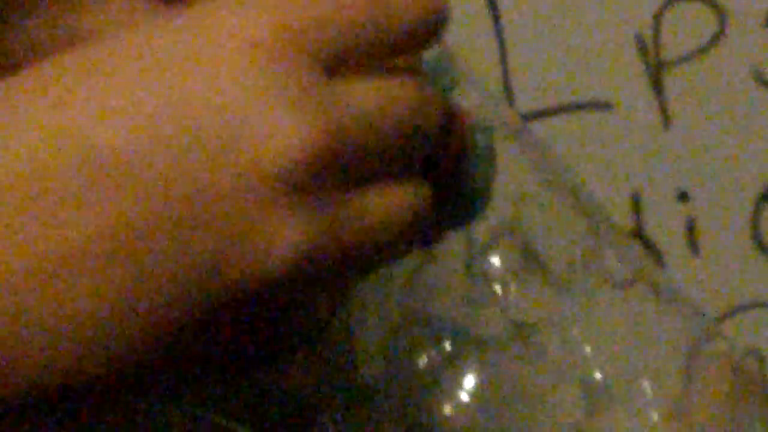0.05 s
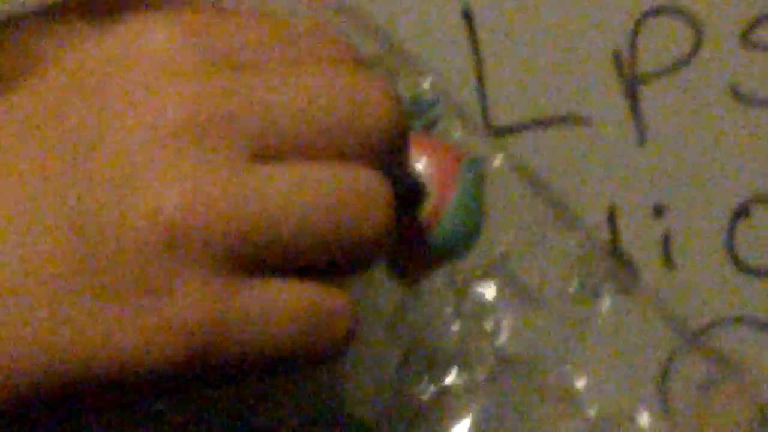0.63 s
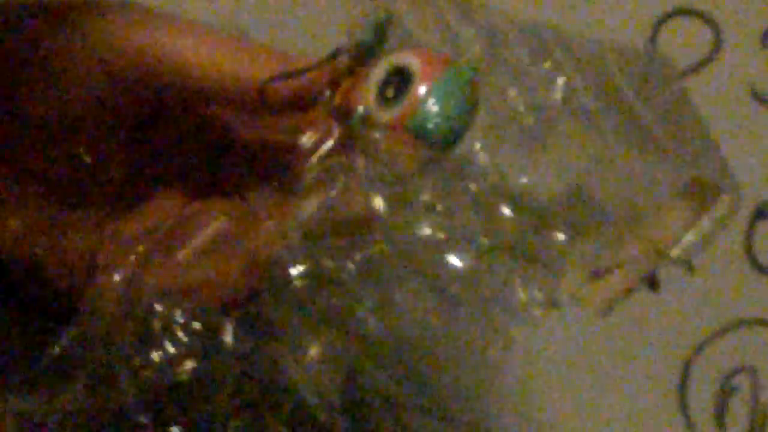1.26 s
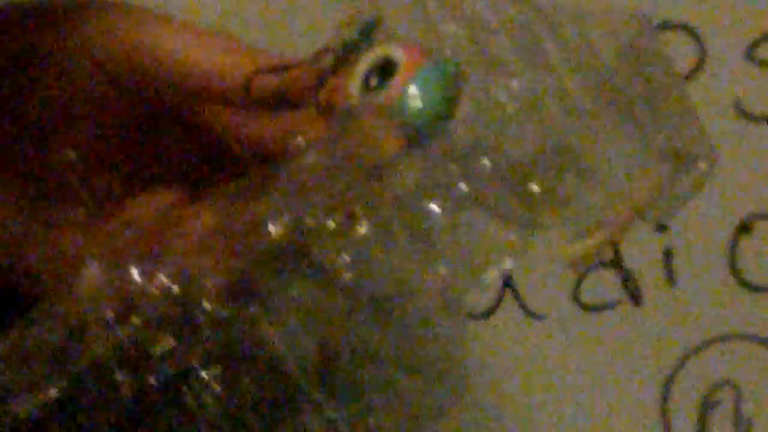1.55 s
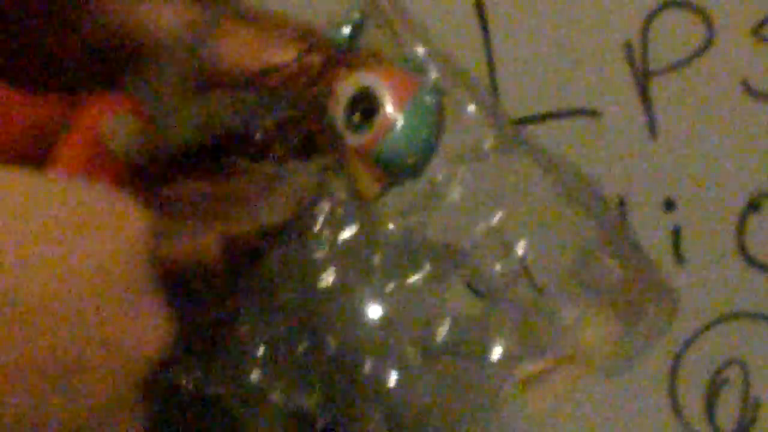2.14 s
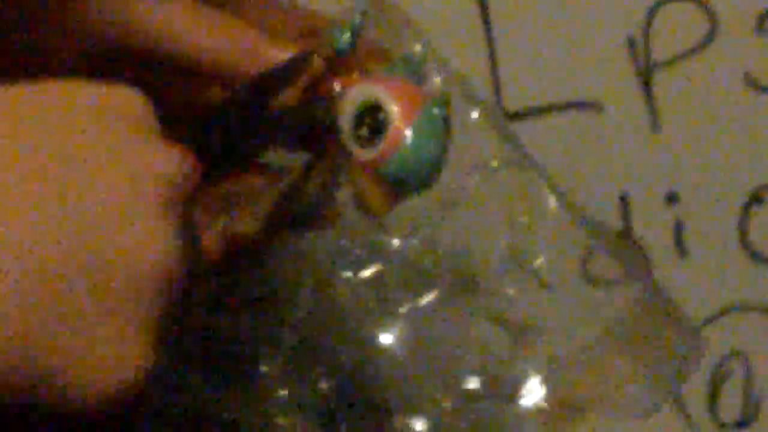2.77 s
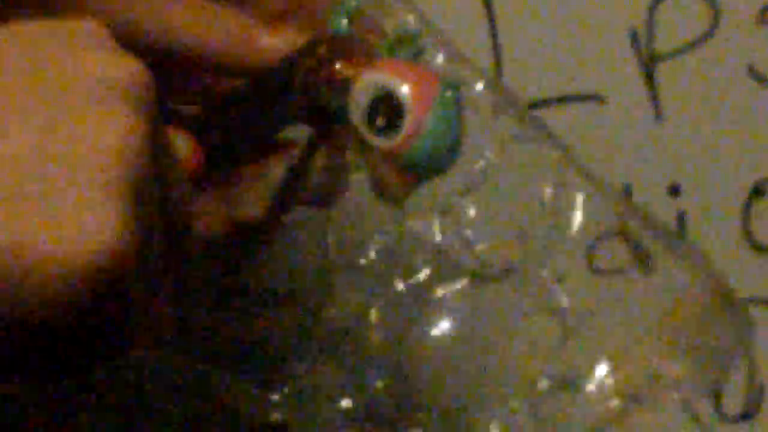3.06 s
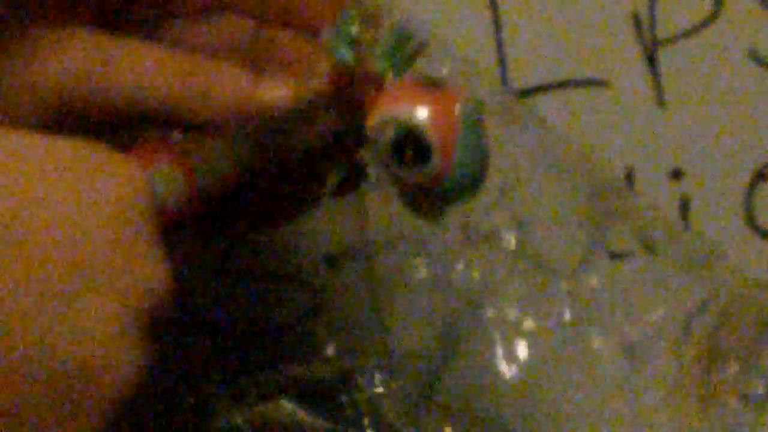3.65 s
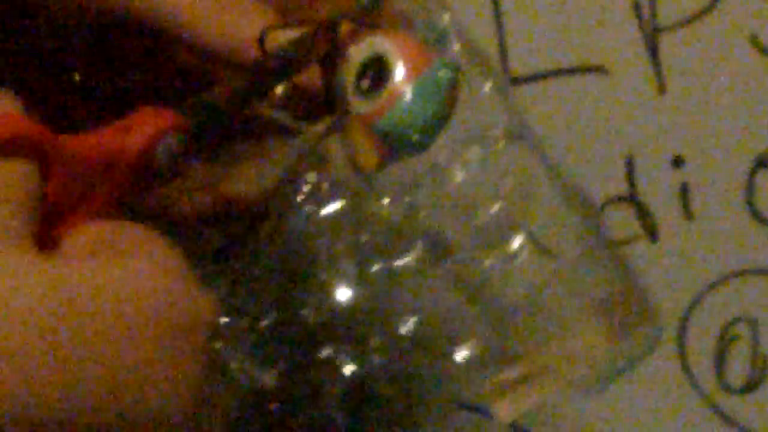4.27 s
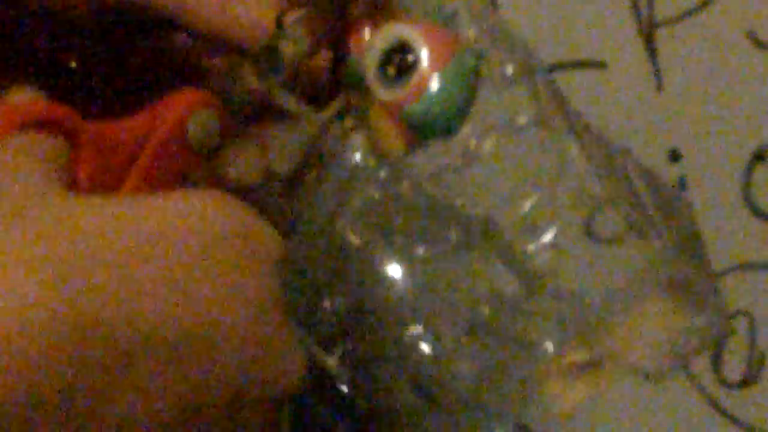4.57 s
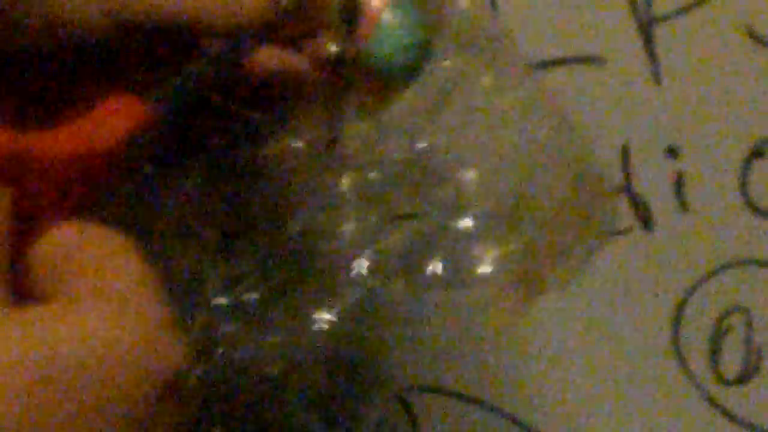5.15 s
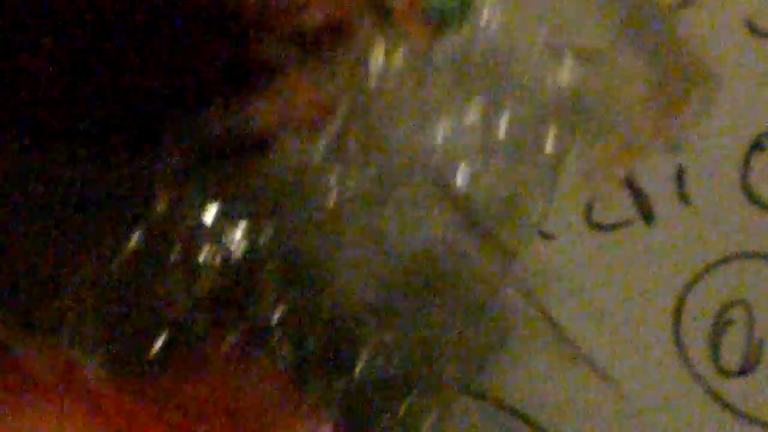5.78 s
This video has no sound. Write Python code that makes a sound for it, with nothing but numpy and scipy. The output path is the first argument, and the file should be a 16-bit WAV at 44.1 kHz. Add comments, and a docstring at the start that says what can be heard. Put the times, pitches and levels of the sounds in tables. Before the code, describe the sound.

A stiff plastic package crackles and buckles close by in a quiet room, pauses, then snaps more loudly as a seam gives.

```python
"""A room, a small camera's microphone close to hands prying at a stiff clear plastic package.
Over steady room hiss a low rumble swells and fades, each pry crinkles faintly, and fingertips bump the shell.
Creases snap, edges scrape, and at 1.2 s a whole panel buckles. After a lull the prying resumes at 3.4 s;
at 5 s one seam gives in a quickening run, then a panel buckles again and the last creases snap.
Near walls throw each snap back within about 15 ms, and a short room tail follows."""
import sys
import numpy as np
from scipy import signal
from scipy.fft import rfft
from scipy.io import wavfile

SR = 44100
rng = np.random.default_rng(int(sys.argv[2]) if len(sys.argv) > 2 else 0)


def persist_wave(psi):
    """Save psi, clipped to +-1, as 16-bit WAV."""
    counts = np.round(np.clip(psi, -1, 1) * 32767).astype(np.int16)
    wavfile.write(sys.argv[1], SR, np.atleast_2d(counts).T)


N = 265041


def amp(db):
    """Decibels to gain."""
    return 10 ** (np.asarray(db) / 20)


def unit(x):
    """Scales to rms 1."""
    return x / np.sqrt(np.mean(x ** 2) + 1e-20)


def read(points, hz):
    """Reads a table on a log-frequency axis."""
    f, value = np.transpose(points)
    return np.interp(np.log(hz + 1), np.log(f + 1), value)


def add(mix, s, sound):
    """Mixes a sound in at time s."""
    part = mix[max(round(s * SR), 0):][:len(sound)]
    part += sound[:len(part)]


def noise(length, hz, kind):
    """White noise through a low-, high- or band-pass filter."""
    return signal.sosfilt(signal.butter(2, hz, kind, fs=SR, output="sos"), rng.standard_normal(length))


def colour(x, db_of, size=4096):
    """Causal filter whose gain in dB is a function of frequency."""
    log_gain = np.log(amp(db_of(abs(np.fft.fftfreq(size, 1 / SR)))) + 1e-6)
    taps = np.fft.ifft(np.exp(signal.hilbert(log_gain).conj())).real
    return signal.fftconvolve(x, taps[:size // 2])[:len(x)]


def band_levels(edges, total_db, pitch_hz, focus):
    """Shares total_db among bands, each weaker by focus dB per octave from the pitch."""
    centres = np.sqrt(np.multiply(edges[:-1], edges[1:]))
    db = -focus * abs(np.log2(centres / pitch_hz))
    return total_db + db - 10 * np.log10(np.sum(amp(db) ** 2))


def set_bands(x, edges, levels_db, span_s):
    """Filters each band towards its level, counting its energy over span_s."""
    edges, hz = np.array(edges, float), np.fft.rfftfreq(len(x), 1 / SR)
    power = 2 * abs(rfft(x)) ** 2 / (len(x) * span_s * SR)
    have_db = 10 * np.log10(np.histogram(hz, edges, weights=power)[0] + 1e-20)
    low, high = edges[:-1], edges[1:]
    inner_hz = np.column_stack([low ** .8 * high ** .2, low ** .2 * high ** .8]).ravel()
    gains = np.column_stack([inner_hz, np.repeat(levels_db - have_db, 2)])
    return colour(x, lambda f: read(gains, f), size=2048)


# the room's steady air at the microphone: (frequency [Hz], level [dB])
AIR_SPECTRUM = [(15, -24), (30, -11), (60, -2), (115, 0.5), (170, 1), (260, -13.5), (450, -1), (700, -14.5),
                (880, -11), (990, 1), (1120, -12), (1400, -9), (3000, -13), (15500, -24)]

def room_tone(level_db=-73.7):
    """The air of the room hisses under everything."""
    return amp(level_db) * unit(colour(rng.standard_normal(N), lambda f: read(AIR_SPECTRUM, f)))


# pries of the hands: (start [s], letting go [s], peak over rest [dB])
PRIES = [(0.096, 0.178, 7.5), (0.364, 1.324, 24.5), (3.407, 3.547, 26.5), (3.543, 4.068, 17),
         (4.192, 4.473, 21.5), (4.679, 5.384, 31), (5.45, 5.69, 18.5)]

def effort(relax_db_per_s=60.5):
    """Each pry builds, then lets go. Gives dB over rest, and whether the plastic is strained."""
    t = np.arange(N) / SR
    effort_db, straining = np.zeros(N), np.zeros(N, bool)
    for start, end, db in PRIES:
        building = db * (t - start) / (end - start)
        relaxing = db - relax_db_per_s * (t - end)
        effort_db = np.maximum(effort_db, np.minimum(building, relaxing))
        straining |= (t > start) & (t < end)
    return effort_db, straining


# low rumble at the microphone: (frequency [Hz], level [dB])
RUMBLE_SPECTRUM = [(15, -35.5), (30, -15.5), (52, -13), (75, -6), (115, -3.5), (200, -13), (500, -15),
                   (1000, -16), (3000, -24), (16000, -39.5)]

def rumble(rest_db=-80.5):
    """A low rumble swells around the loud snaps and dies away after them."""
    swell_db, _ = effort()
    low_noise = unit(colour(rng.standard_normal(N), lambda f: read(RUMBLE_SPECTRUM, f)))
    return amp(rest_db + swell_db) * low_noise


# shell resonances, from whole panels to small creases: (frequency [Hz], width [Hz], lift [dB])
SHELL_MODES = [(231.5, 45, 8), (346.7, 13, 7), (555, 49, 9.5), (830, 110, 5.5), (1154, 28, 5),
               (1317, 43, 4), (1440, 70, 1.5), (1940, 98, 3), (2540, 290, 2.5), (3332, 86, 0),
               (4400, 170, 0), (7010, 580, 6.5)]

def shell_db(hz):
    """The shell's resonances stand out of a bed of dense modes."""
    return sum(db / (1 + (2 * (hz - f) / width) ** 2) for f, width, db in SHELL_MODES)


# broad tone of snapping plastic, close up: (frequency [Hz], level [dB])
SNAP_SPECTRUM = [(60, -42), (250, -32), (800, -27), (1150, -18), (1500, -9.5), (1900, -8), (2800, -5),
                 (4000, -3), (5100, -6.5), (5700, -12), (8200, -10), (10000, -22), (12200, -28.5),
                 (16000, -40.5)]

def plastic_db(hz):
    """Crinkles, snaps and scrapes share one bright tone and ring the same shell."""
    return read(SNAP_SPECTRUM, hz) + shell_db(hz)


def slips(length, per_s, spread_db):
    """A random train of tiny slips, most small and a few large."""
    sizes = amp(spread_db * np.minimum(rng.exponential(1, length), 4))
    signs = rng.choice([-1, 1], length)
    slipping = rng.random(length) < per_s / SR
    return unit(sizes * signs * slipping)


def crinkles(ring_t60=0.012, rest_db=-81, follow=0.64):
    """While the plastic is strained, tiny creases tick at random, louder with the effort."""
    t = np.arange(1024) / SR
    effort_db, straining = effort()
    ticks = slips(N, per_s=130, spread_db=4)
    ring = rng.standard_normal(len(t)) * amp(-60 * t / ring_t60)
    crackle = unit(colour(signal.fftconvolve(ticks, ring)[:N], plastic_db))
    return crackle * straining * amp(rest_db + follow * effort_db)


def thump(db, hz, t60, onset_s=0.0044, scuff=0.4):
    """A whole panel swings at one deep note, with a dull scuff."""
    t = np.arange(SR // 4) / SR
    puff = unit(noise(len(t), [hz / 2, hz * 2], "band"))
    envelope = amp(db - 60 * t / t60) * (1 - np.exp(-t / onset_s))
    return envelope * (np.sin(2 * np.pi * hz * t) + scuff * puff)


# fingertips on the shell: (time [s], level [dB], pitch [Hz])
FINGER_BUMPS = [(0.142, -55, 159), (1.350, -45, 424), (1.419, -43, 250), (3.492, -39.5, 192),
                (4.595, -51.5, 372), (4.928, -46, 132)]

def finger_bumps():
    """Each fingertip sets a panel swinging briefly."""
    out = np.zeros(N)
    for s, db, hz in FINGER_BUMPS:
        add(out, s, thump(db, hz, t60=0.055))
    return out


# a snap's low, middle and high bands: (edge [Hz])
SNAP_BANDS = [900, 2500, 5500, 12000]
# small level trim for each band: (gain [dB])
SNAP_TRIM_DB = [-0.64, -0.15, -1.04]
# sharp snaps close up, and the strong wall echoes that follow two of them (at 3.4992 and 5.4456 s):
# (time [s], relative level [dB], pitch [Hz], focus [dB/octave])
SNAPS_AND_ECHOES = [(0.4674, -56, 3860, 5), (0.57, -57.5, 3700, 8), (0.623, -53.5, 2940, 4),
                    (0.6768, -40, 2250, 12.5), (0.6937, -43, 3740, -0.5), (0.7881, -35.5, 3840, 5.5),
                    (0.9044, -32.5, 3820, 11), (0.9505, -39, 4040, 16.5), (0.9625, -39.5, 3860, 4.5),
                    (1.0074, -46.5, 4900, 11), (1.046, -44, 2820, 15), (1.0833, -38, 2610, 12.5),
                    (1.1259, -36.5, 4160, -1.5), (2.3485, -57.5, 2500, 3), (3.2084, -44, 2900, 4),
                    (3.4467, -48.5, 2100, 18.5), (3.4885, -16.5, 4780, 7.5), (3.4992, -18.5, 4430, 15.5),
                    (3.5889, -38.5, 7000, 2.5), (3.6211, -41, 2990, 20), (3.6306, -51.5, 3100, 11),
                    (3.7265, -47.5, 7600, 6.5), (3.7872, -51, 4240, 7), (3.8161, -33.5, 4270, 5.5),
                    (3.8655, -36, 3770, 5.5), (3.9334, -46.5, 7030, -1), (3.9674, -41.5, 2590, 7.5),
                    (4.0312, -50, 2010, 5), (4.0494, -43, 2610, 7), (4.0571, -30, 4700, 7.5),
                    (4.263, -54, 1750, 12), (4.2873, -45, 1750, 8.5), (4.3, -39, 3730, 3.5),
                    (4.3446, -41, 2470, 6), (4.3485, -29.5, 3050, 8.5), (4.4306, -45, 6000, 0),
                    (4.4668, -35.5, 2480, 6.5), (4.4862, -39, 3260, 3), (4.5965, -49, 2100, 22.5),
                    (4.8212, -48, 4250, 10), (4.8493, -49.5, 4380, 9), (4.8902, -39.5, 4080, 5),
                    (5.1452, -35.5, 3940, 6.5), (5.1889, -33, 3730, 7.5), (5.2488, -17, 4380, 9),
                    (5.4324, -25.5, 2530, 7), (5.4456, -29.5, 4080, 21), (5.4696, -37, 2520, 6),
                    (5.517, -32.5, 2530, 8), (5.5625, -32.5, 2500, 8.5), (5.604, -36, 2513, 8.5),
                    (5.8402, -44, 2540, 5.5)]

def snaps(ring_t60=0.026, bending_s=.0007, tick_t60=0.0082, tick_onset_s=0.00008,
          split_hz=5500, crease_octaves=.2, gain_db=-7):
    """Each snap or echo is a tick and a ring of dense, damped modes; the treble dies first."""
    out, t = np.zeros(N), np.arange(2048) / SR
    for s, db, pitch_hz, focus in list(SNAPS_AND_ECHOES) + seam():
        ring = noise(len(t), split_hz, "low") * amp(-60 * t / ring_t60)
        ring *= 1 - np.exp(-t / bending_s)  # long bending waves arrive after the tick
        tick = noise(len(t), split_hz, "high") * amp(-60 * t / tick_t60)
        tick *= 1 - np.exp(-t / tick_onset_s)
        crease_db = lambda f: focus / (1 + (np.log2((f + 1) / pitch_hz) / crease_octaves) ** 2)
        snap = colour(ring + tick, lambda f: plastic_db(f) + crease_db(f))
        levels_db = band_levels(SNAP_BANDS, gain_db + db, pitch_hz, focus) + SNAP_TRIM_DB
        add(out, s, set_bands(snap, SNAP_BANDS, levels_db, span_s=0.02))
    return out


# edges rubbing the shell: (start [s], end [s], relative level [dB], centre [Hz])
EDGE_SCRAPES = [(0.55, 0.7, -64, 3400), (0.677, 0.737, -51.5, 2610), (0.799, 0.845, -53, 4000),
                (1.035, 1.091, -48, 2570), (1.124, 1.17, -43.5, 3994), (1.209, 1.229, -41.5, 4686),
                (3.471, 3.487, -45.5, 1950), (3.511, 3.542, -35, 5400), (4.281, 4.426, -51, 2800),
                (4.9, 5.003, -58.5, 3130), (5.255, 5.29, -24.5, 3620), (5.433, 5.473, -47, 3780)]

def scrapes(focus_db=7, ring_t60=0.011, gain_db=-5):
    """Stick and slip: fine grains ring the shell around a pitch set by the spot that is rubbed."""
    out, t = np.zeros(N), np.arange(512) / SR
    for start, end, db, centre_hz in EDGE_SCRAPES:
        length = max(round((end - start) * SR), len(t))
        ring = rng.standard_normal(len(t)) * amp(-60 * t / ring_t60)
        grains = slips(length, per_s=1100, spread_db=4.5) * signal.windows.tukey(length, .5)
        spot_db = lambda f: -focus_db * np.minimum(np.log2((f + 1) / centre_hz) ** 2, 2)
        scrape = colour(signal.fftconvolve(grains, ring), lambda f: plastic_db(f) + spot_db(f))
        add(out, start, amp(db + gain_db) * unit(scrape))
    return out


# broad tone of a buckling panel, close up: (frequency [Hz], level [dB])
BUCKLE_SPECTRUM = [(30, -27.5), (100, -7), (230, 1.5), (700, -1), (2000, 2), (4500, 4.5), (6000, -7.5),
                   (8200, -8), (10500, -14.5), (12500, -32), (16000, -30)]
# its five bands: (edge [Hz])
BUCKLE_BANDS = [100, 450, 1100, 2500, 5500, 12000]
# panels giving way: (climax [s], rise [s], fall [s], level [dB], pitch [Hz], focus [dB/octave], swing [dB])
PANEL_BUCKLES = [(1.228, 0.0048, 0.0062, -22, 1480, 8, -32), (5.304, 0.014, 0.014, -16, 3920, 6.5, -21)]

def buckles():
    """A panel gives way in an avalanche of snaps."""
    out, t = np.zeros(N), np.arange(-SR // 20, SR // 8) / SR
    for s, rise, fall, db, pitch_hz, focus, _ in PANEL_BUCKLES:
        envelope = np.exp(np.minimum(t / rise, -t / fall))
        avalanche = slips(len(t), per_s=9000, spread_db=3.5) * envelope
        burst = colour(avalanche, lambda f: read(BUCKLE_SPECTRUM, f) + shell_db(f))
        levels_db = band_levels(BUCKLE_BANDS, db, pitch_hz, focus)
        add(out, s + t[0], set_bands(burst, BUCKLE_BANDS, levels_db, span_s=rise + fall))
    return out


# a panel's deep modes: (pitch [Hz], level against the swing [dB], t60 [s])
PANEL_MODES = [(247, -1.5, 0.067), (342, -2.5, 0.11), (545, 1.5, .08)]

def panel_swings(lead_s=.004):
    """A buckle drives the panel's deep modes just before its climax."""
    out = np.zeros(N)
    for s, *_, swing_db in PANEL_BUCKLES:
        for hz, mode_db, t60 in PANEL_MODES:
            add(out, s - lead_s, thump(swing_db + mode_db, hz, t60))
    return out


def seam(start_s=5.014, teeth=8, first_gap_s=.019, gap_share=.915, pitch_hz=3780, focus=7.5):
    """A seam gives tooth by tooth, each gap shorter than the last. Gives rows for snaps()."""
    gaps = first_gap_s * gap_share ** np.arange(teeth)
    times = start_s + np.cumsum(gaps) - gaps
    levels_db = -33.5 - 2.5 * np.linspace(-1, 1, teeth) ** 2  # loudest in the middle
    return [(s, db, pitch_hz, focus) for s, db in zip(times, levels_db)]


# near surfaces, heard from the microphone: (delay [s], level [dB])
NEAR_ECHOES = [(.0042, -14.5), (.0096, -4), (0.0109, -12), (0.0144, -9), (.0163, -9), (.0215, -32),
               (.029, -36)]
# the room's tail: (frequency [Hz], t60 [s])
ROOM_DECAY = [(100, 0.3), (400, 0.21), (1200, 0.49), (3000, 0.34), (8000, 0.18), (15000, .5)]

def reflections(early_db=-7, early_t60=0.18, late_db=-16, build_up_s=0.015, wander_s=.0005):
    """Single echoes off near surfaces, a quick scatter from the furniture, and a faint longer tail."""
    t = np.arange(SR) / SR
    opening = np.clip(t / build_up_s - .5, 0, 1)
    early = rng.standard_normal(SR) * opening * amp(-60 * t / early_t60)
    hz, frame_s, spectrum = signal.stft(rng.standard_normal(SR), SR, nperseg=256)
    decay = amp(-60 * frame_s / read(ROOM_DECAY, hz)[:, None])
    late = signal.istft(spectrum * decay, SR, nperseg=256)[1][:SR] * opening
    response = amp(early_db) * early / np.linalg.norm(early) + amp(late_db) * late / np.linalg.norm(late)
    for delay, db in NEAR_ECHOES:
        add(response, delay + wander_s * rng.uniform(-1, 1), amp([db]) * rng.choice([-1, 1]))
    return response


def room(x, facets=6, facet_s=.011):
    """From moment to moment a different facet of the shell sounds, each with its own paths to the walls."""
    sounding = np.arange(N) / SR / facet_s % facets
    out = x.copy()
    for facet in range(facets):
        away = abs((sounding - facet + facets / 2) % facets - facets / 2)
        crossfade = np.cos(np.pi / 2 * np.minimum(away, 1))
        out += signal.fftconvolve(x * crossfade, reflections())[:N]
    return out


def scene():
    """The package close up with the room around it, in mono."""
    thumps = finger_bumps() + panel_swings()
    thump_echoes = signal.fftconvolve(thumps, reflections())[:N] * amp(-2)
    crackle = room(snaps() + buckles() + scrapes() + crinkles())
    return (crackle + thumps + thump_echoes + rumble() + room_tone())[None]


def record(dry):
    """Limits the highest peaks and cuts the top of the treble."""
    ceiling, edge_hz = .86, 15750
    lowpass = signal.firwin(511, edge_hz, window=("kaiser", 9), fs=SR)
    return signal.oaconvolve(np.clip(dry, -ceiling, ceiling), lowpass[None], "same")


dry = scene()
out = record(dry)
persist_wave(out)
```